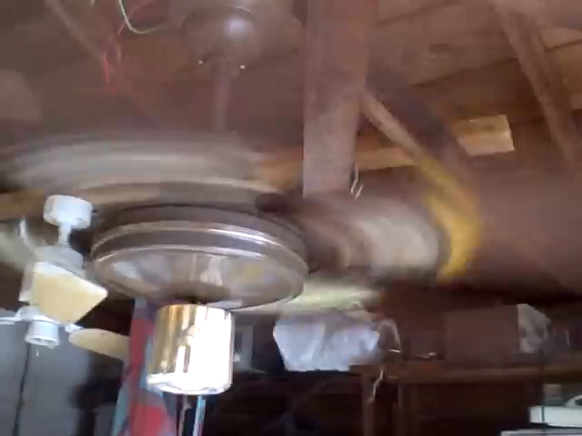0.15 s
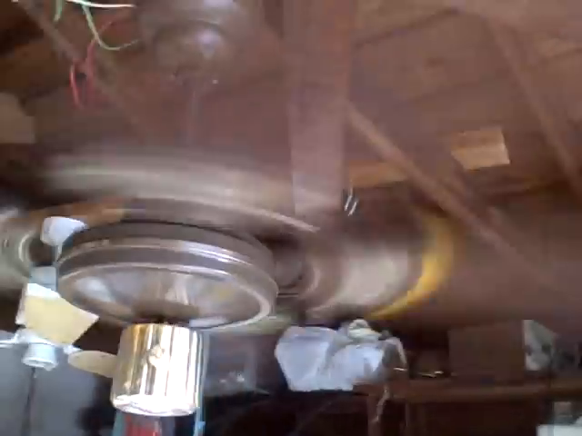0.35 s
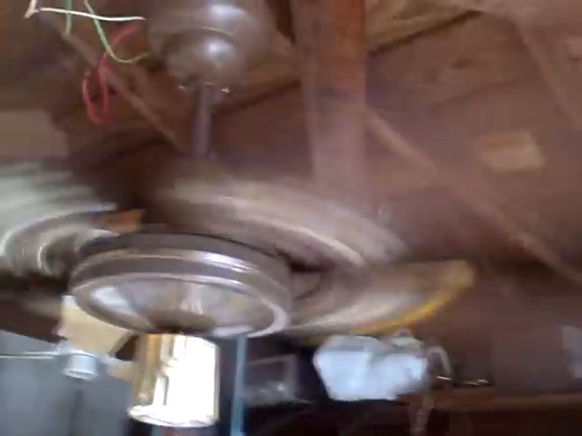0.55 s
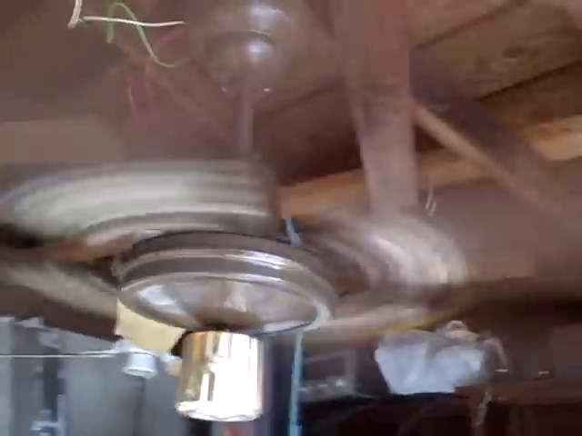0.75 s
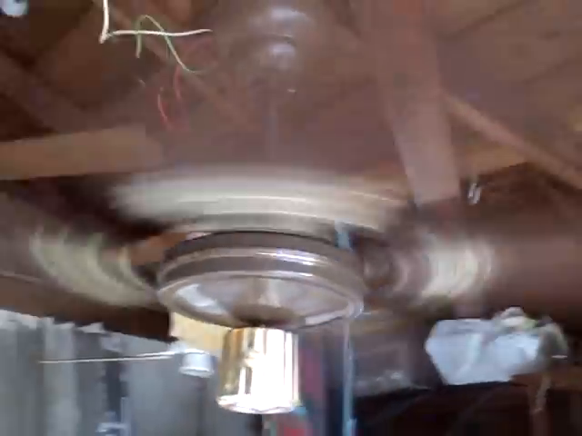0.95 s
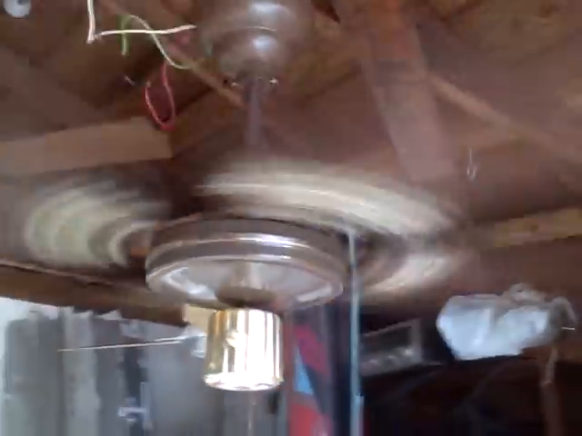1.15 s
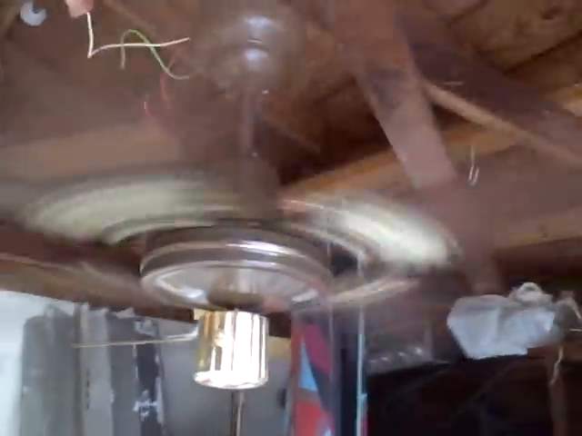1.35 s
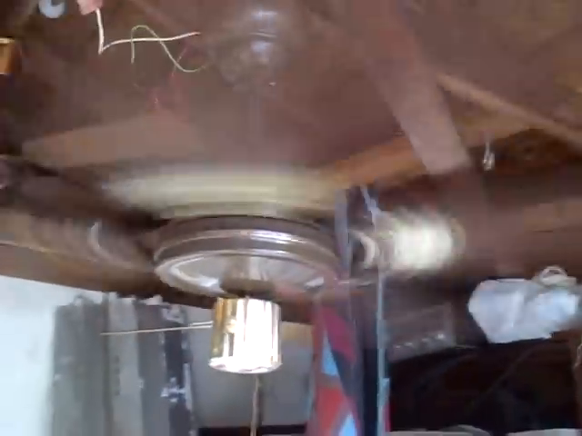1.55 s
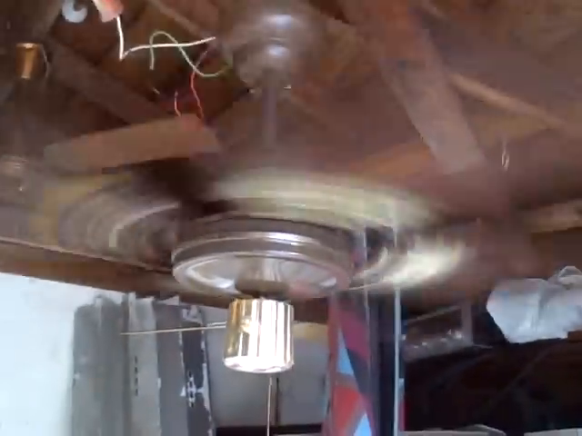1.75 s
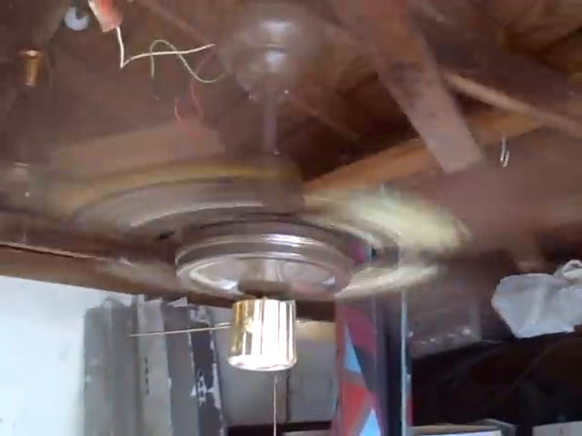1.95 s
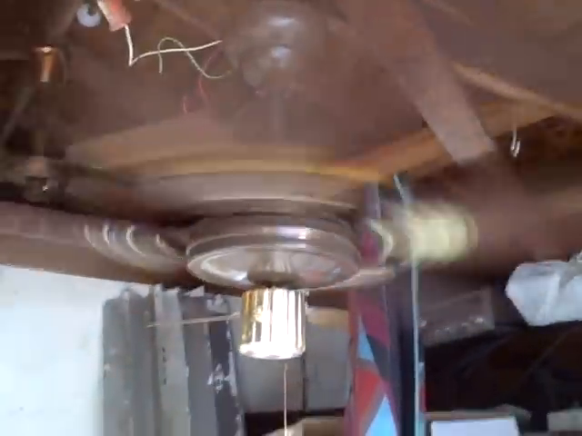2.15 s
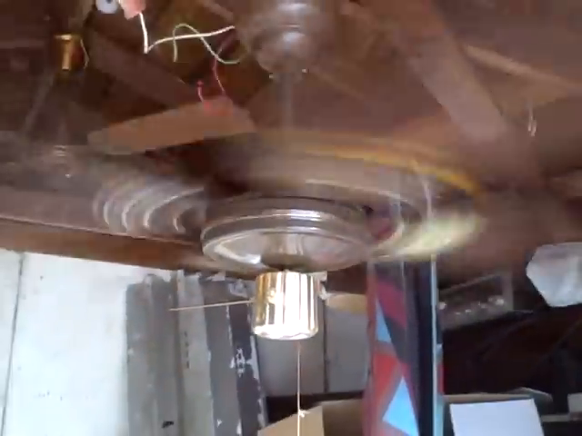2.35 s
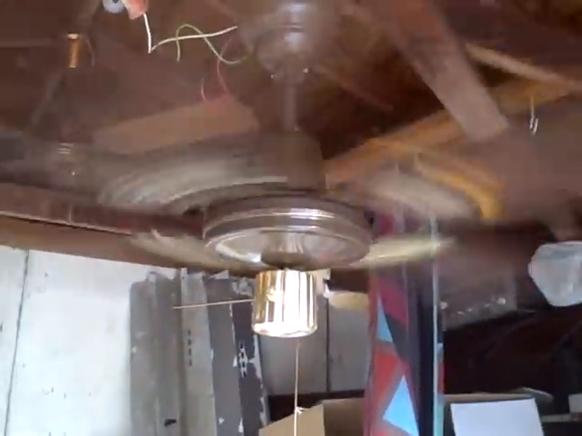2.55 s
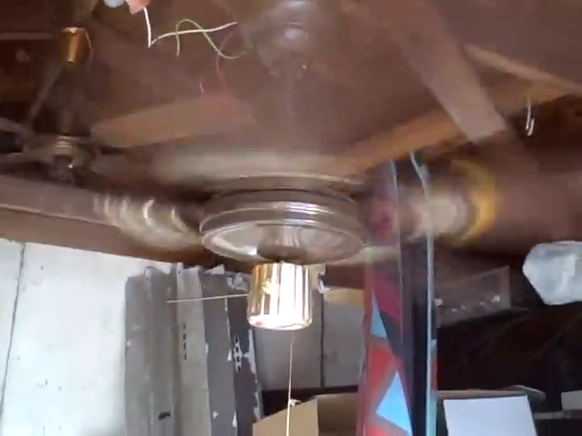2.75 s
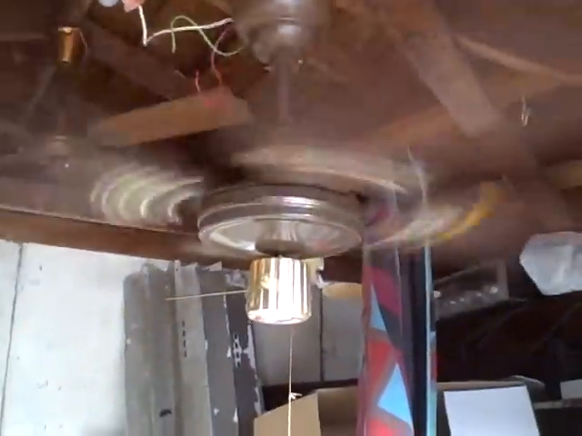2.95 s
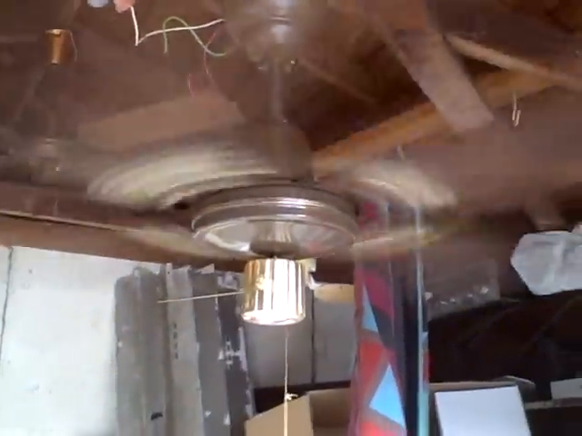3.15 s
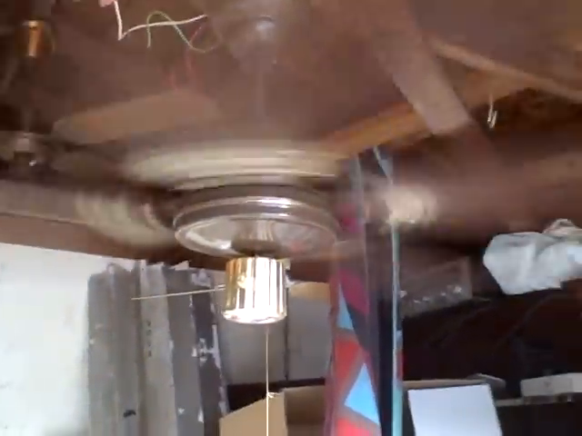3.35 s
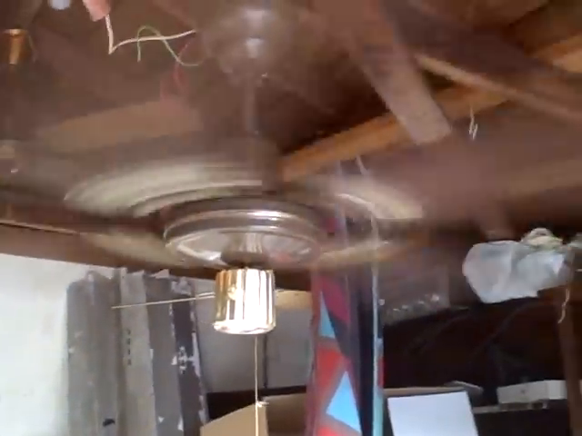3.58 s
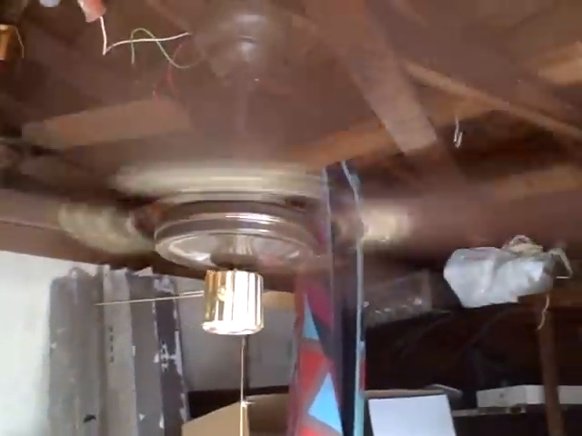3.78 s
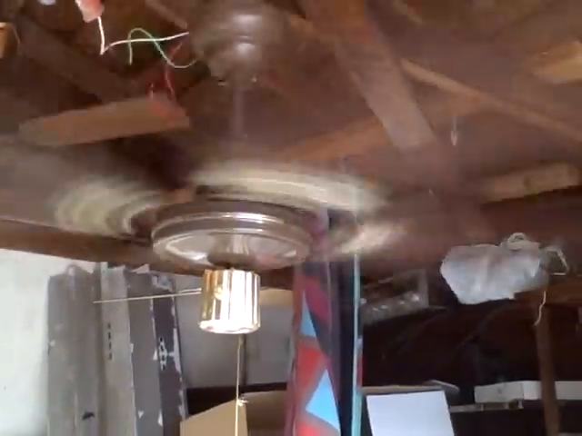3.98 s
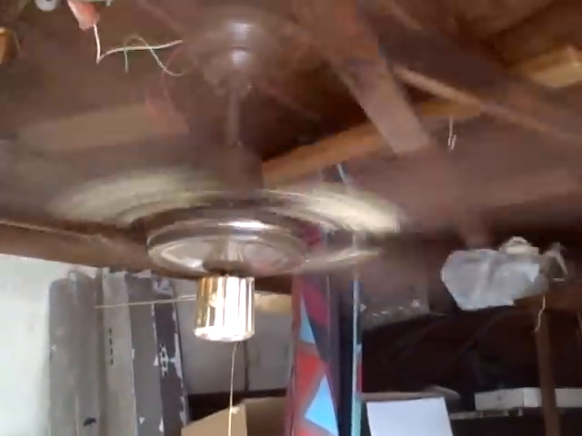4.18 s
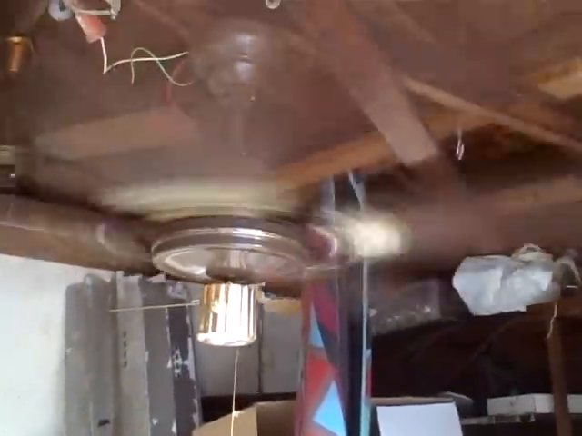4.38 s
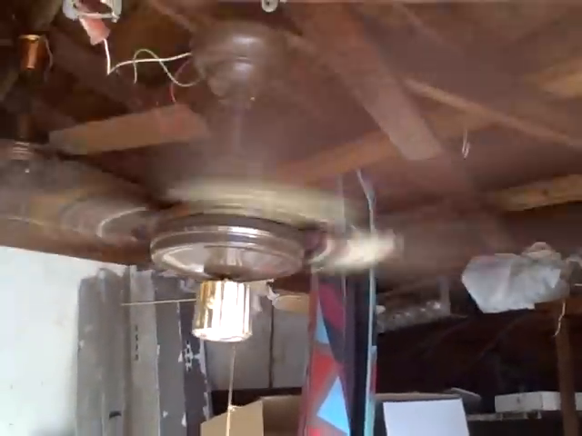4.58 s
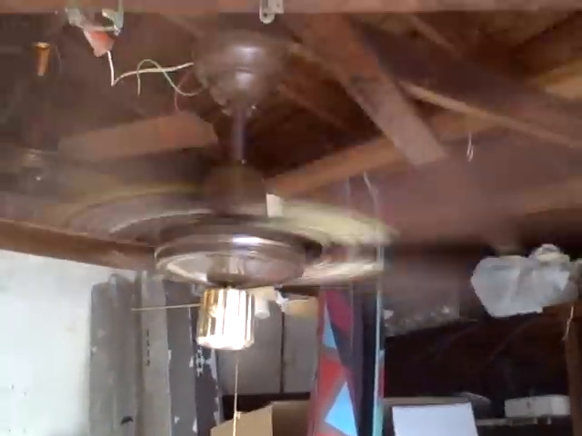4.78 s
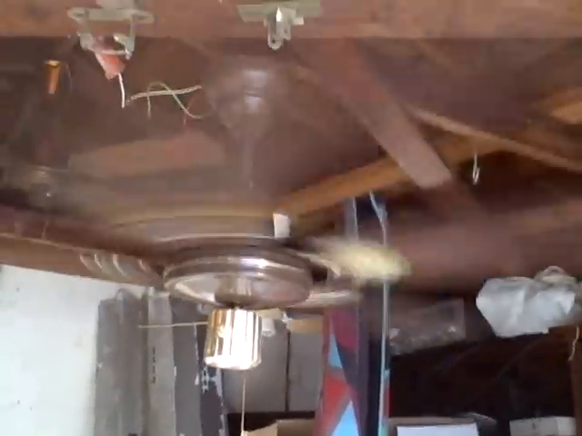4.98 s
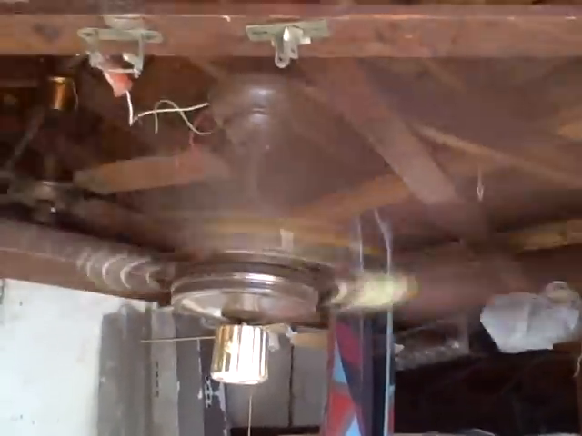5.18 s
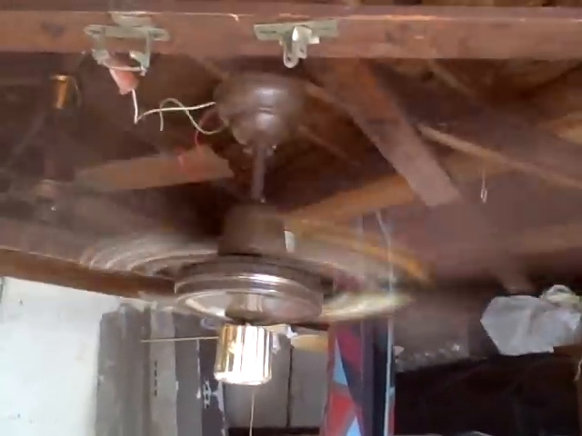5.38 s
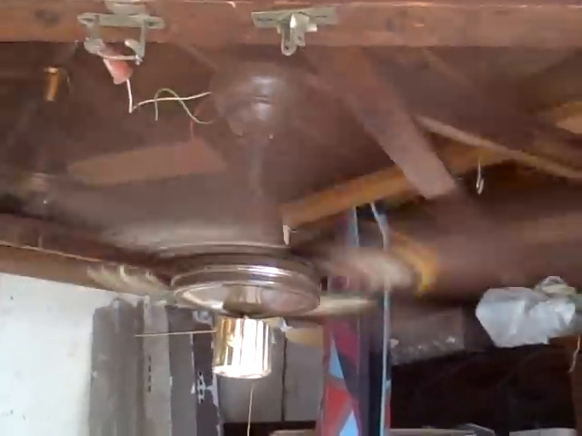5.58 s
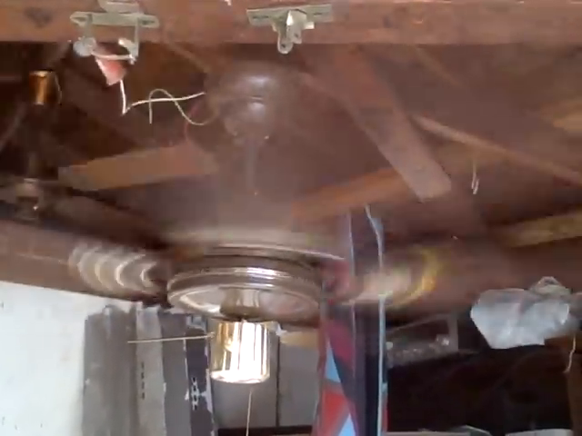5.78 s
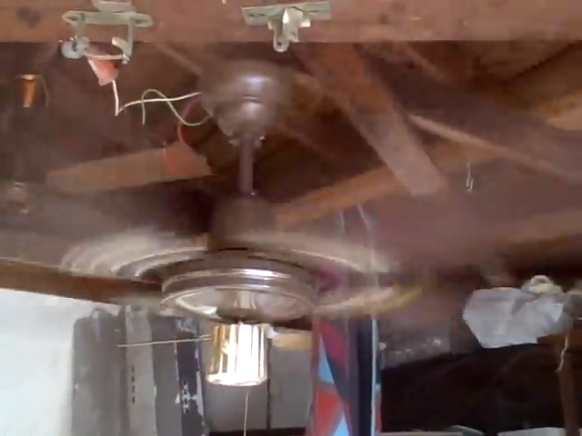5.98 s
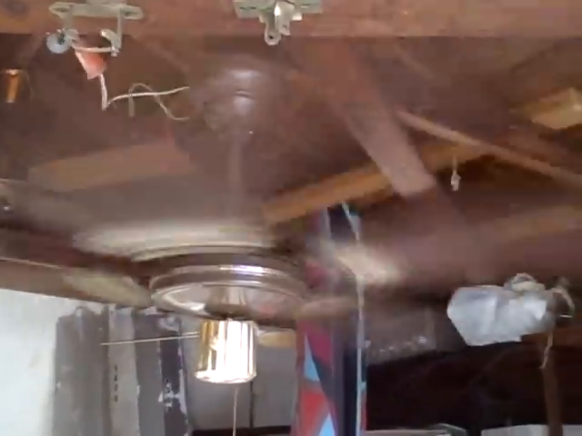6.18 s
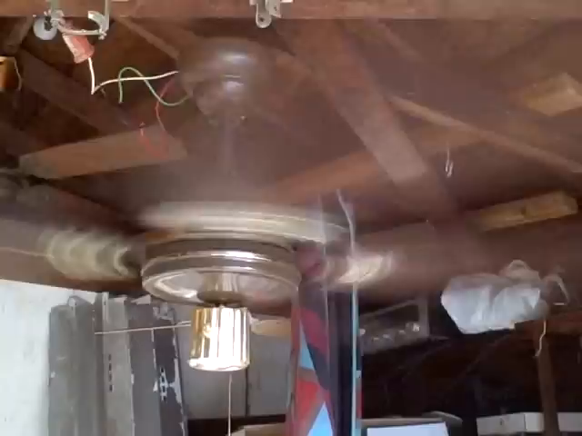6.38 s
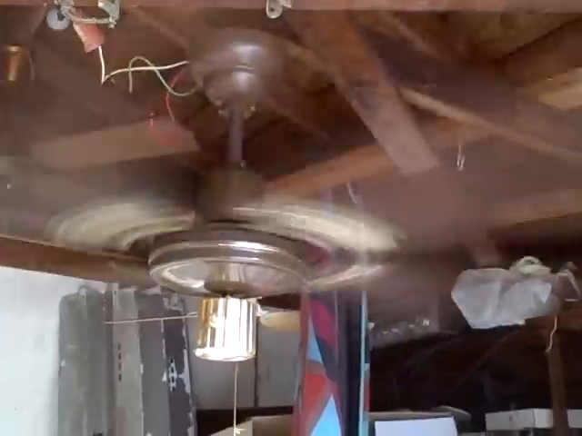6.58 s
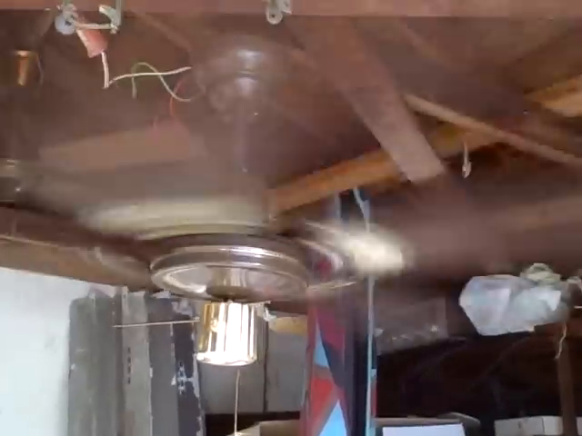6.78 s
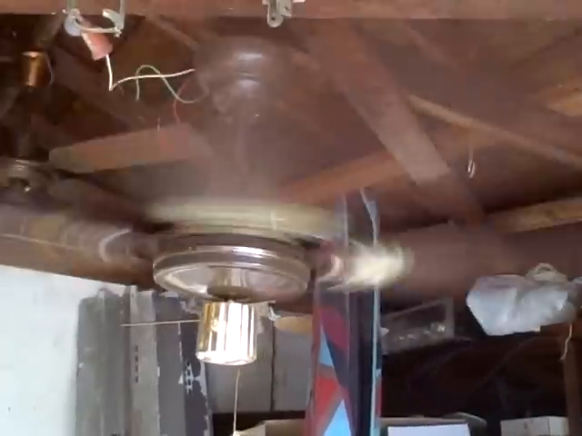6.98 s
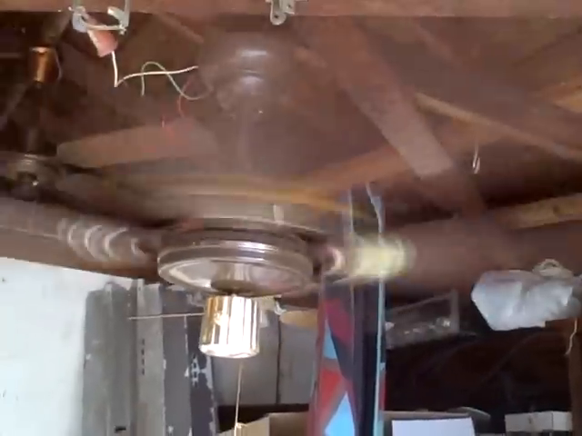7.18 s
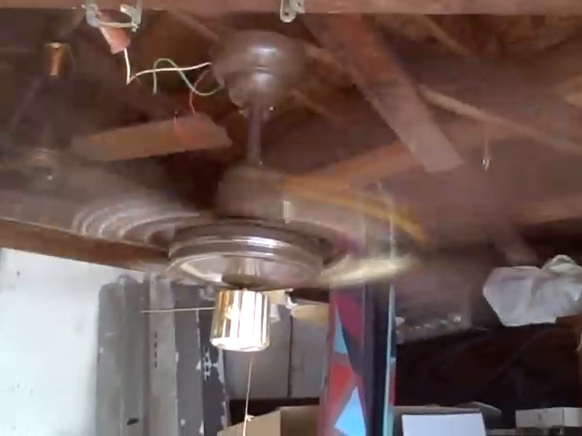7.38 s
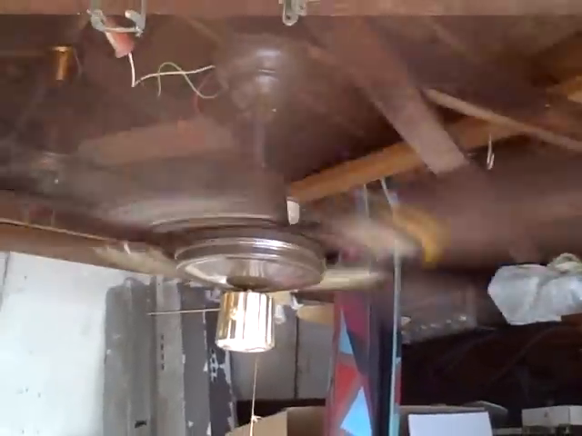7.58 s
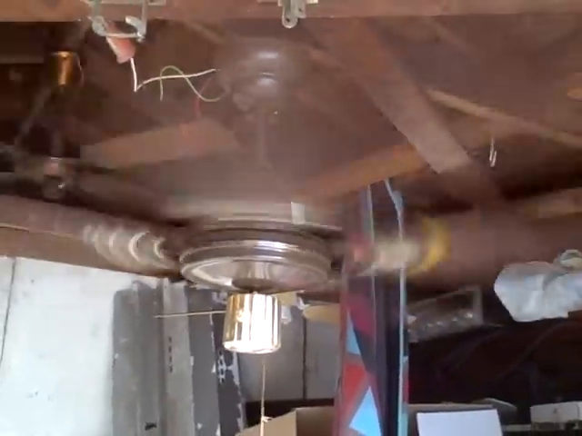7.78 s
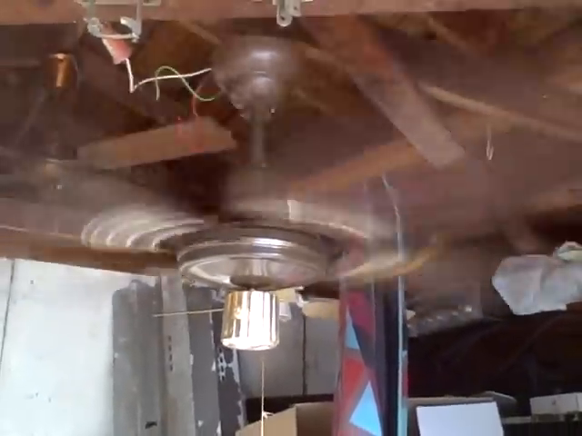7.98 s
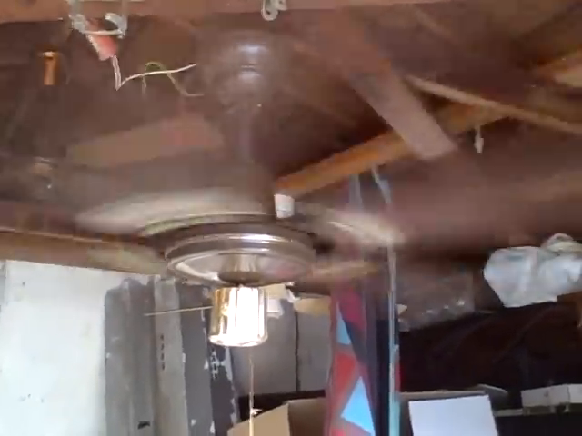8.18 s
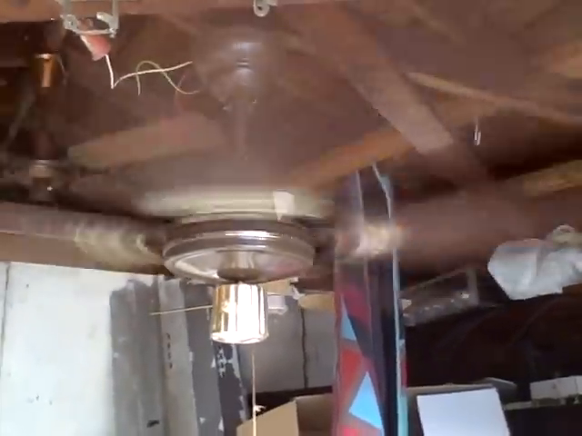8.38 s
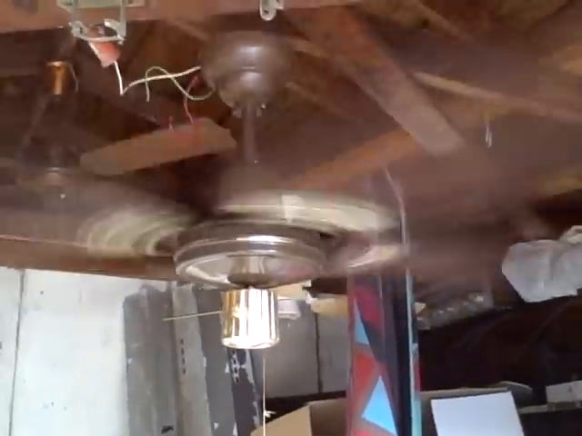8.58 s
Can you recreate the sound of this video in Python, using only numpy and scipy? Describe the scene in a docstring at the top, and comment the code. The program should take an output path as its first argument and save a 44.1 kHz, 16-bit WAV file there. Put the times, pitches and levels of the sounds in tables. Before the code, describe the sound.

A running fan heard from just below its blades, indoors. Fast fluttering wind pulses overload the opening second with gusty low bumps, then fade to a steadier whir. Beneath lie a low rolling rumble and weak electrical hum; above, a breathy rush and thin bright hiss flicker with the blades. Light scuffs near the microphone occur around four seconds, followed by a faint thin whistle-like squeak. Speed stays constant throughout.

```python
"""Four-bladed ceiling fan

A ceiling fan turns in a storage room, heard from just below its blades. Each blade brings a pressure pulse,
a sum of blade-rate harmonics, and a puff of turbulent noise: strong at first, less as the microphone draws back.
Shaped noise makes the rumble, the rush of the blades, the housing's rings and the hiss; sines make the motor's
hum and thin whine. Short noise bursts make early gusts and rustles early and midway; a wavering sine squeaks."""
import sys
import numpy as np
from scipy import signal
from scipy.fft import rfft, irfft
from scipy.io import wavfile

SR = 44100
rng = np.random.default_rng(int(sys.argv[2]) if len(sys.argv) > 2 else 0)


def file_out(sig):
    """Save sig as 16-bit WAV at sys.argv[1]."""
    # one column per channel
    cols = np.atleast_2d(sig).T
    # limit, then scale
    lim = np.clip(cols, -1, 1)
    pcm = np.round(lim * 32767).astype(np.int16)
    wavfile.write(sys.argv[1], SR, pcm)


N = 381024
T = np.arange(N) / SR
HZ = np.fft.rfftfreq(N, 1 / SR)


def amp(db):
    """Decibel law: level to amplitude ratio."""
    return 10 ** (np.asarray(db) / 20)


def unit(x):
    """Normalization: scales a signal to rms 1."""
    return x / np.sqrt(np.mean(x ** 2) + 1e-20)


def curve(rows):
    """Linear interpolation of a (time, value) table at every sample."""
    times, values = np.transpose(rows)
    return np.interp(T, times, values)


def colour(points):
    """Spectral envelope: gain at every frequency, interpolated in dB over log frequency."""
    hz, db = np.transpose(points)
    return amp(np.interp(np.log(HZ + 1), np.log(hz + 1), db))


def noise(gain):
    """Filtered white noise of rms 1 with the given gain at every frequency."""
    spectrum = rfft(rng.standard_normal(N)) * gain
    return unit(irfft(spectrum, N))


def drift(hz):
    """Low-pass random fluctuation of rms 1, up to about hz."""
    return noise(np.exp(-(HZ / hz) ** 2))


def resonance(centre_hz, width_hz):
    """Resonance curve: gain is 1 at the centre and half at width_hz to either side."""
    return 1 / (1 + ((HZ - centre_hz) / width_hz) ** 2)


# Rotor speed: (time [s], speed [turns/s])
ROTOR_SPEED = [(0, 4.605), (1.5, 4.605), (2, 4.582), (8.64, 4.579)]
# Relative pulse level of each blade, as the four are not pitched quite alike: (level [dB])
BLADE_LEVELS = [1.5, 2.5, 0.24, -0.45]
BLADE_COUNT = len(BLADE_LEVELS)
FIRST_BLADE_S = .0235


def rotor():
    """Rotational phase, the integral of speed: blades gone by, whole when one is overhead."""
    turns = np.cumsum(curve(ROTOR_SPEED)) / SR
    return BLADE_COUNT * (turns - np.interp(FIRST_BLADE_S, T, turns))


def overhead(passes, width, lead=0.):
    """Periodic window: a bump reaching 1 once a blade; width and lead in blade spacings."""
    return np.exp(-(np.sin(np.pi * (passes + lead)) / (np.pi * width)) ** 2)


# Draft strength at the microphone, lower as it draws back: (time [s], relative level [dB])
DRAFT_STRENGTH = [(0.0, -21.5), (0.83, -23.5), (2.74, -35.5), (4.28, -32), (4.64, -37.5), (6.53, -34),
                  (8.5, -37)]


def draft_level():
    """Distance law given as a table: draft strength in dB at every sample."""
    return curve(DRAFT_STRENGTH)


def nearness():
    """Level difference: dB of the draft above its median, which several fan sounds follow in part."""
    return draft_level() - np.median(draft_level())


# Spectrum of the turbulent wake: (frequency [Hz], relative level [dB per Hz])
WAKE_SPECTRUM = [(15, -12), (40, -21), (110, 3), (220, -0.5), (400, -3.5), (750, -9.5), (1200, -24.5),
                 (2000, -23.5), (4000, -37.5), (8000, -32)]


def draft(passes, pulse_db=-1.3, fall_db=7.0, skew=0.39, uneven_db=1.4, buffet_db=-17.0,
          width=0.16, lead=0.044, between=0.12, sway=0.018):
    """Blade-passing harmonics: suction under each blade, and the turbulent wake that buffets with it."""
    blade_db = np.interp(passes, np.arange(BLADE_COUNT), BLADE_LEVELS, period=BLADE_COUNT)
    strength = amp(draft_level() + blade_db + uneven_db * drift(21))
    swayed = passes + sway * drift(31)  # eddies bring each pulse a little early or late
    suction = 0
    for k in range(1, 7):  # each harmonic is fall_db below the one before; skew [rad] tilts the pulse
        suction = suction - amp(-fall_db * k) * np.cos(2 * np.pi * k * swayed - skew)
    wake = noise(colour(WAKE_SPECTRUM)) * (between + overhead(passes, width, lead))
    return strength * (amp(pulse_db) * unit(suction) + amp(buffet_db) * unit(wake))


def eddies(level_db=-11.5, centre_hz=30, width_hz=22):
    """Large-scale turbulence: slow eddies of the draft shove the microphone between the blades."""
    band = np.exp(-((HZ - centre_hz) / width_hz) ** 2)
    return amp(draft_level() + level_db) * noise(band)


# Spectrum of the low roll: (frequency [Hz], relative level [dB per Hz])
RUMBLE_SPECTRUM = [(4, -29), (12, -28), (28, -14), (42, -4.5), (54, 2.5), (68, -2.5), (95, -7), (115, -4.5),
                   (170, -9), (240, -12.5), (340, -21), (700, -37.5)]


def rumble(level_db=-39, gust_db=1., follow=0.16):
    """Low-frequency flow noise of air driven round the room, a little stronger within the draft."""
    level = amp(level_db + follow * nearness() + gust_db * drift(14))
    return level * noise(colour(RUMBLE_SPECTRUM))


# Spectrum of air shed from the blade edges: (frequency [Hz], relative level [dB per Hz])
RUSH_SPECTRUM = [(150, -18.5), (330, -10), (390, -8), (440, 0), (520, -5), (640, -2.5), (700, -5.5),
                 (790, -6), (920, -13), (1100, -14), (1350, -19), (1800, -22), (3000, -29.5), (6000, -36)]


def rush(passes, level_db=-40.5, follow=0.21, swish_db=3.0, width=0.33, lead=0.13, gust_db=0.94):
    """Edge-shedding noise, amplitude-modulated: it swells as each blade comes near."""
    swell = amp(swish_db * overhead(passes, width, lead) + gust_db * drift(15))
    return amp(level_db + follow * nearness()) * unit(swell * noise(colour(RUSH_SPECTRUM)))


# Body resonances: (frequency [Hz], width [Hz], level before the common trim [dB rms], swing once a turn [dB])
HOUSING_RINGS = [(521.2, 37, -44.5, 2.5), (2055, 53, -59, -0.5), (5080, 140, -67.5, -3)]


def housing(passes, level_db=-0.16, follow=0.15, loudest_turn=0.65):
    """Noise-driven resonance: fuzzy rings of the fan's body vary once a turn with the rotor's wobble."""
    wobble = np.cos(2 * np.pi * (passes / BLADE_COUNT - loudest_turn))
    rings = 0
    for hz, width_hz, db, swing_db in HOUSING_RINGS:
        rings = rings + amp(db + swing_db * wobble) * noise(resonance(hz, width_hz))
    return rings * amp(level_db + follow * nearness())


# Mains hum and thin electrical whine: (frequency [Hz], level before wavering [dB rms])
STEADY_TONES = [(120, -53), (7597.5, -75), (7656, -74.5)]


def hum(waver_db=3.):
    """Pure tones: the motor's mains hum and the thin whine, each randomly wavering in level."""
    tones = 0
    for hz, db in STEADY_TONES:
        sine = np.sqrt(2) * np.sin(2 * np.pi * (hz * T + rng.random()))
        tones = tones + amp(db + waver_db * drift(3.0)) * sine
    return tones


# Spectrum of the fine hiss: (frequency [Hz], relative level [dB per Hz])
HISS_SPECTRUM = [(800, -8.5), (2000, -7), (2550, -4), (3100, -9.5), (4200, -5.5), (5400, -3), (6100, 2.5),
                 (6700, 3), (7400, -1.5), (8000, -14.5)]


def hiss(passes, level_db=-47, follow=0.078, blade_db=0.82, pair_db=0.42, flutter_db=1.0):
    """Amplitude modulation: fine hiss flutters with each blade and with each opposite pair."""
    beat_db = blade_db * np.cos(2 * np.pi * passes) + pair_db * np.cos(np.pi * passes)
    level = amp(level_db + follow * nearness() + beat_db + flutter_db * drift(29))
    return level * noise(colour(HISS_SPECTRUM))


# Hardest puffs of wake to hit the microphone: (peak time [s], peak level [dB])
PUFF_TIMES = [(.076, -38), (.129, -34), (.292, -33.5), (.348, -35), (.509, -34.5), (.727, -30),
              (0.778, -33), (.945, -29), (.999, -34.5), (1.052, -34)]
# Their spectrum: (frequency [Hz], relative level [dB per Hz])
PUFF_SPECTRUM = [(40, -10), (130, 0), (300, 0), (750, 0), (1100, -8.5), (1600, -16.5), (3000, -26),
                 (8000, -42)]


def puffs(rise_s=0.0058, fall_s=.012):
    """Impulsive turbulence: short rough gusts rise faster than they fall."""
    level = 0
    for peak_s, db in PUFF_TIMES:
        time_scale = np.where(T < peak_s, rise_s, fall_s)
        level = level + amp(db) * np.exp(-((T - peak_s) / time_scale) ** 2)
    return level * noise(colour(PUFF_SPECTRUM))


# Short rustles close to the microphone: (start [s], nominal length [s], peak level [dB])
RUSTLE_TIMES = [(0.232, .022, -47), (0.879, 0.02, -44), (4.263, 0.078, -39.5), (4.347, 0.018, -45),
                (4.359, 0.056, -41.5), (4.414, 0.046, -39.5), (4.487, 0.013, -42), (4.497, 0.036, -39.5)]
# Their spectrum: (frequency [Hz], relative level [dB per Hz])
RUSTLE_SPECTRUM = [(700, -13), (2000, -8), (4700, -5.5), (5050, -1), (6400, 2), (7300, 1), (8000, -17)]


def rustles(grain_db=2.5, rise=0.11, ring_hz=5105, ring_width_hz=30, ring_db=-12):
    """Friction noise: grainy scuffs start quickly and fade, with a thin resonance in them."""
    level = 0
    for start_s, length_s, db in RUSTLE_TIMES:
        corners = start_s + length_s * np.array([0, rise, .6, 1.2])  # start, full, fading, silent
        level = level + amp(db) * np.interp(T, corners, [0, 1, 1, 0])
    ring = amp(ring_db) * noise(resonance(ring_hz, ring_width_hz))
    scuff = noise(colour(RUSTLE_SPECTRUM)) + ring
    return level * unit(scuff * amp(grain_db * drift(500)))


def squeak(level_db=-49.0, start_s=5.315, length_s=.3, start_hz=5860, sag_hz_per_s=700,
           jitter_hz=60, rough_db=2):
    """Frequency modulation: a thin unsteady whistle swells, fades and sinks a little."""
    age = np.clip(T - start_s, 0, length_s)
    hz = start_hz - sag_hz_per_s * age + jitter_hz * drift(316)
    swell = np.sin(np.pi * age / length_s) ** 2
    whistle = np.sqrt(2) * np.sin(2 * np.pi * np.cumsum(hz) / SR)
    return amp(level_db + rough_db * drift(120)) * swell * whistle


def scene():
    """Superposition: the fan and the small sounds beside it add in one channel."""
    passes = rotor()
    wind = draft(passes) + eddies() + rumble() + puffs()
    fan = rush(passes) + housing(passes) + hum() + hiss(passes)
    return (wind + fan + rustles() + squeak())[None]


# Gain of the mirrored treble: (frequency [Hz], gain [dB])
MIRROR_GAIN = [(8000, 1), (9000, -6), (10000, -12), (11000, -19.5), (12000, -27), (13000, -34),
               (15000, -49), (16000, -75)]
RECORDER_HZ, EDGE_HZ = 16000, 15300  # sample rate of the recorder, upper band limit


def record(dry):
    """Spectral imaging: a low sample rate mirrors the treble about half that rate; then the band limit."""
    ends = signal.windows.tukey(N, .001)  # brief fades at both ends
    kept = irfft(rfft(dry * ends) * (HZ < RECORDER_HZ / 2), N)
    carrier = 2 * np.cos(2 * np.pi * RECORDER_HZ * T)
    image = rfft(kept * carrier) * colour(MIRROR_GAIN)
    return irfft((rfft(kept) + image) * (HZ < EDGE_HZ), N)


dry = scene()
out = record(dry)
file_out(out)
```